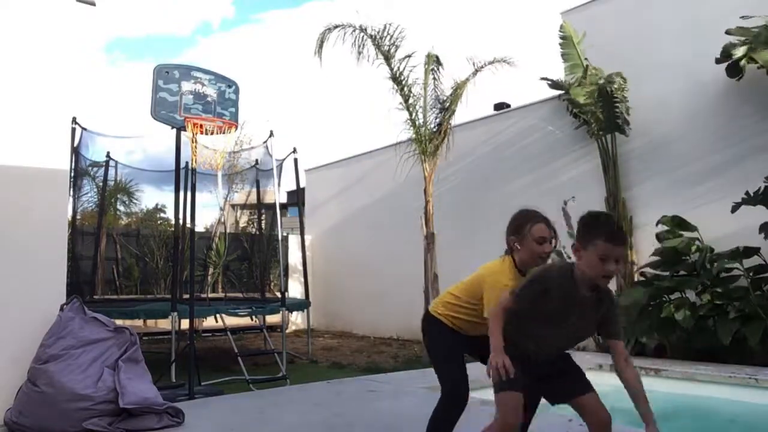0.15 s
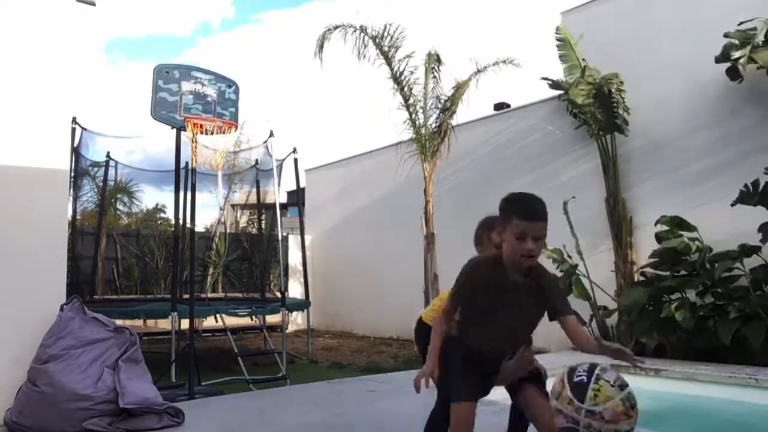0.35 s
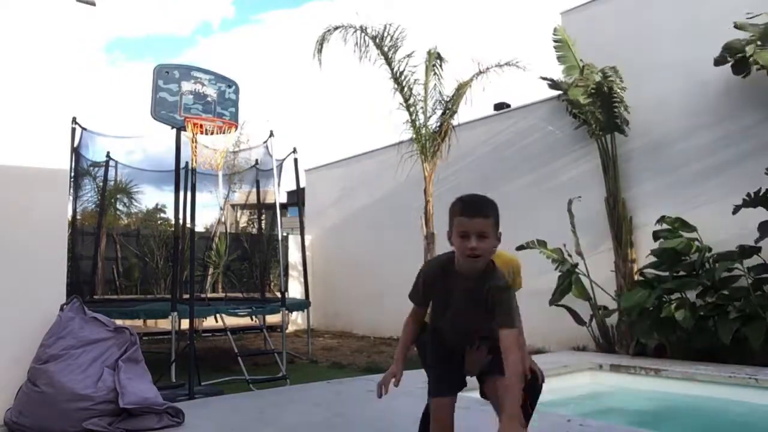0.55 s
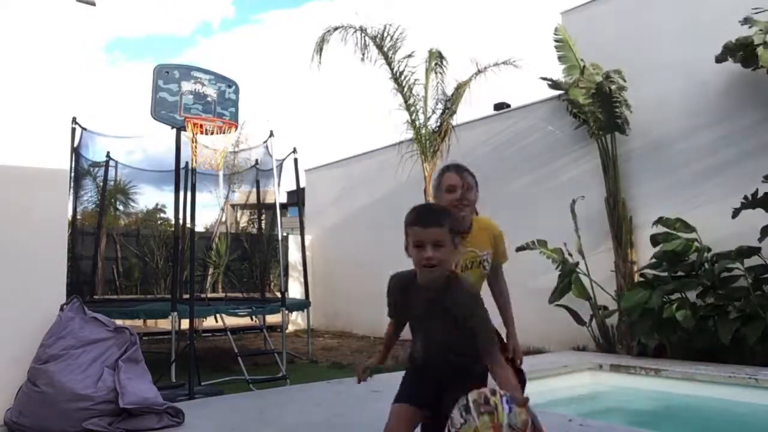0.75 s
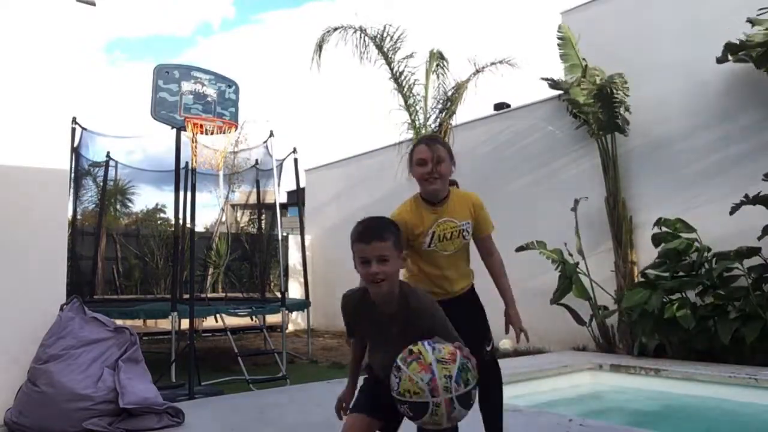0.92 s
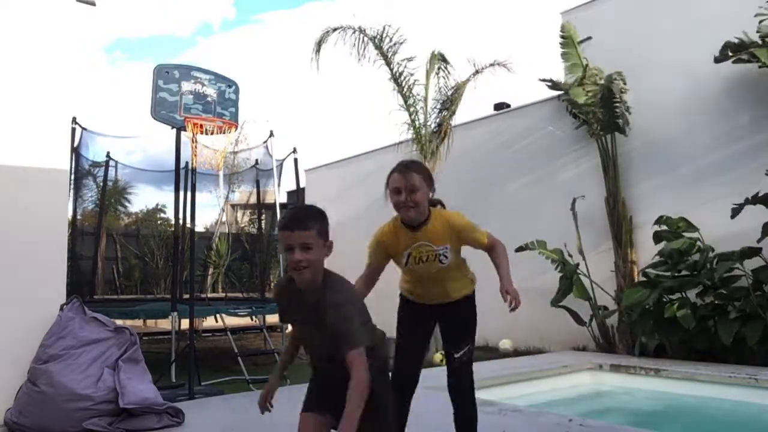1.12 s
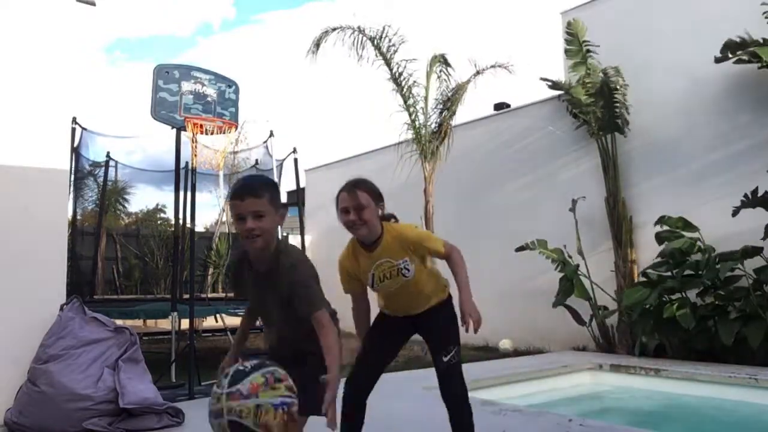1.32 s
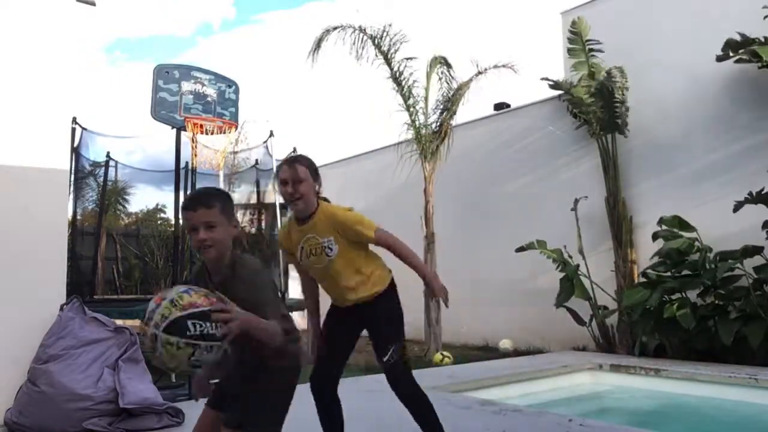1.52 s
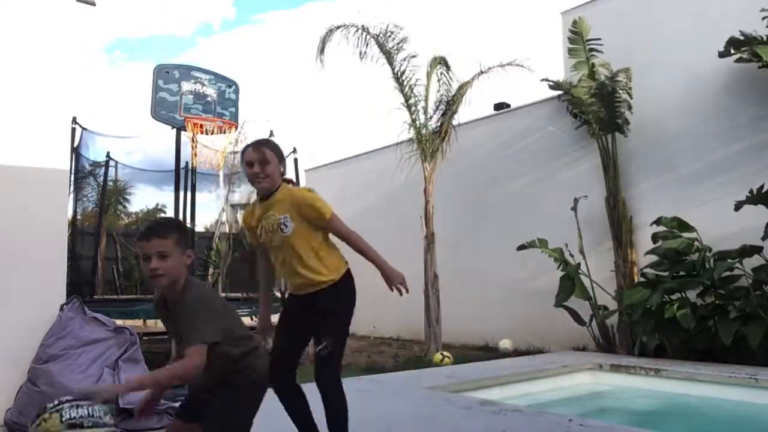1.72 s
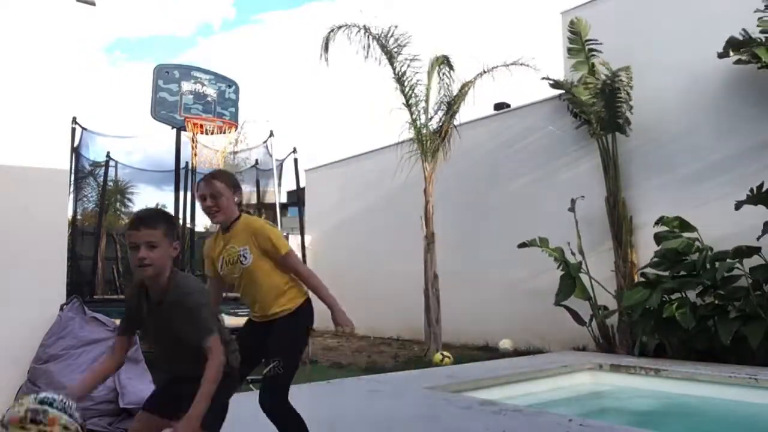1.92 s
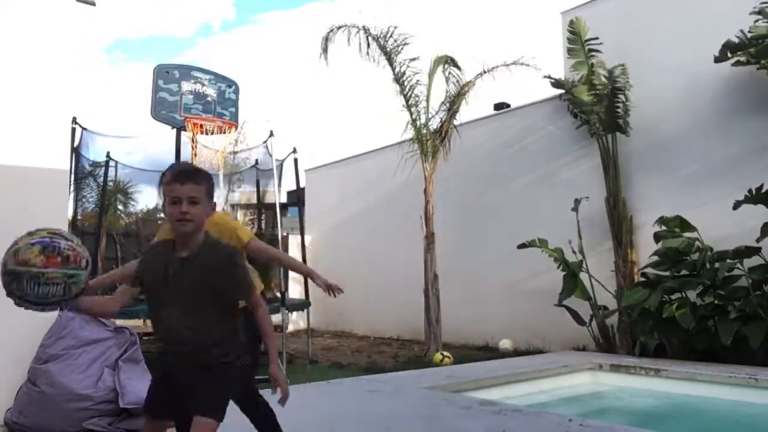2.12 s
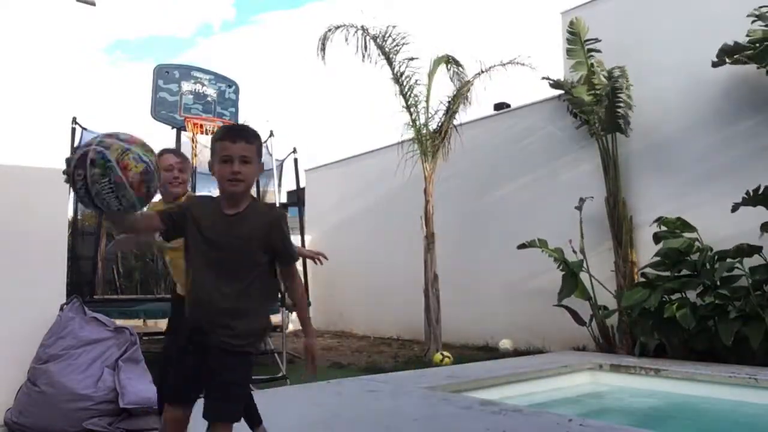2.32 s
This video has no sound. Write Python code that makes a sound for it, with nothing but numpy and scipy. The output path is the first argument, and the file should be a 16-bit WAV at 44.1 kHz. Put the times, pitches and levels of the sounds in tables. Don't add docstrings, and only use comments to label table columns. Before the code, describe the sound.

A basketball bounces slowly on hard concrete, slapping and thumping with short echoes off backyard walls

```python
import sys
import numpy as np
from scipy import signal
from scipy.io import wavfile
from scipy.ndimage import uniform_filter1d

SR = 44100
rng = np.random.default_rng(int(sys.argv[2]) if len(sys.argv) > 2 else 0)


def rack_gain(trim_db):
    fader = np.asarray(trim_db, float)
    return 10 ** (fader / 20)


def to_wav(s):
    ch = np.atleast_2d(s).T
    pcm = np.round(np.clip(ch, -1, 1) * 32767)
    wavfile.write(sys.argv[1], SR, pcm.astype(np.int16))


N = 103635


def at_hz(points, hz):
    table = np.array(points)
    return np.interp(np.log(hz), np.log(table[:, 0]), table[:, 1])


def band_filter(x, low_hz, high_hz, order=2):
    return signal.sosfilt(signal.butter(order, [low_hz, high_hz], "band", fs=SR, output="sos"), x)


def bands(size):
    edges = 30 * 2 ** np.arange(0, 9.6, .5)
    lead_in = 4000
    white = rng.standard_normal((2, size + lead_in))
    out = []
    for k, (low, high) in enumerate(zip(edges, edges[1:])):
        out.append((np.sqrt(low * high), band_filter(white[k % 2], low, high)[-size:]))
    return out


def slow_noise(size, span):
    return uniform_filter1d(rng.standard_normal(size), size=span) * np.sqrt(span)


def decay(t, t60):
    return rack_gain(-60 * t / t60)


def hum():
    # frequency in Hz, level in dB.
    hum_colour = [(18, -31), (30, 1), (134, -3.5), (328, -15.5), (499, -20.5), (740, -24), (1160, -25.5),
                  (5450, -37.5), (16000, -50.5)]
    level_db, patchy_db = -54.5, 1.8
    out = 0
    for hz, band in bands(N):
        drift = slow_noise(N, 4000)
        out = out + rack_gain(at_hz(hum_colour, hz) + patchy_db * drift) * band
    return rack_gain(level_db) * out / np.std(out)


def blow(t, thump_db, thump_hz, slap_db, slap_hz, snap_db):
    thump_cycles, rise_s = 2.8, .002
    slab_db, slab_hz, slab_t60_s = -6, 104.2, 0.033
    rise = 1 - np.exp(-t / rise_s)
    air = decay(t, thump_cycles / thump_hz * 2) * np.sin(2 * np.pi * thump_hz * t)
    slab = decay(t, slab_t60_s) * np.sin(2 * np.pi * slab_hz * t)
    thump = rise * (rack_gain(thump_db) * air + rack_gain(thump_db + slab_db) * slab)

    snap_hz, peak_db, skin_db, skin_hz = 4000, 9, 9, 648
    click = 1.0 * (t == 0)
    band = band_filter(click, 370, 8800)
    bright = signal.lfilter(*signal.butter(1, snap_hz, "high", fs=SR), band)
    shelved = band + (rack_gain(snap_db) - 1) * bright
    slap = shelved + rack_gain(peak_db) * signal.lfilter(*signal.iirpeak(slap_hz, 3.0, fs=SR), shelved)
    slap = slap + rack_gain(skin_db) * signal.lfilter(*signal.iirpeak(skin_hz, 1.5, fs=SR), slap)
    return thump, rack_gain(slap_db) * slap


def yard(t):
    # frequency in Hz, level in dB.
    yard_colour = [(50, -32.5), (110, -37.5), (250, -17), (500, -14), (1200, -18.5), (2500, -23),
                   (6000, -15.5), (14000, -29)]
    # frequency in Hz, t60 in seconds.
    yard_t60 = [(60, 1), (160, 0.31), (420, 0.34), (1100, 0.34), (2910, 0.27), (7680, 0.17)]
    # frequency in Hz, level in dB, t60 in seconds.
    standing = [(73.56, -55, 0.68), (103.03, -52.5, 0.65), (113.86, -51.5, 0.64), (156.1, -57, 0.44),
                (256, -37.5, 0.36), (321.9, -30, 0.17), (1003, -32, 0.15), (1446, -31, .2),
                (2190, -35, 0.19), (2554, -41, 0.15), (3890, -27, 0.078), (5110, -25.5, 0.09)]
    late_db, late_stretch = -24.5, 6.7
    out = 0
    for hz, band in bands(len(t)):
        t60 = at_hz(yard_t60, hz)
        fall = decay(t, t60) + rack_gain(late_db) * decay(t, late_stretch * t60)
        out = out + rack_gain(at_hz(yard_colour, hz)) * band * fall
    for hz, db, t60 in standing:
        out = out + rack_gain(db) * decay(t, t60) * np.sin(2 * np.pi * (hz * t + rng.random()))
    return out


def yard_answer(part, tail, build_s, t):
    build = 1 - np.exp(-(t / build_s) ** 2)
    return signal.fftconvolve(part, tail * build)[:SR]


def wall_smear(slap):
    smear_s = .006
    rough = rng.standard_normal(len(slap)) * decay(np.arange(len(slap)) / SR, smear_s)
    return signal.fftconvolve(slap, rough / np.linalg.norm(rough))[:len(slap)]


def heard(rows, echoes, losses, facings):
    near_thump_db, near_slap_db = 5, -1
    wall_thump_db, wall_cut_hz = -14, 6000
    grit_db, grain_db, grain_s = -3, 4, .05
    t = np.arange(SR) / SR
    out = np.zeros(N + 3 * SR)
    for (start_s, *voice), lags, loss, facing in zip(rows, echoes, losses, facings):
        near_s, side_s, far_s = lags
        side_db, far_db = loss
        snap_db, low_db, high_db = facing
        thump, slap = blow(t[:SR // 10], *voice, snap_db)
        grain = slow_noise(SR, 40)
        tail = yard(t)
        grainy_tail = tail * rack_gain(grain_db * grain * np.exp(-t / grain_s))
        smeared = wall_smear(slap)

        sound = rack_gain(low_db) * yard_answer(thump, tail, .017, t)
        sound = sound + rack_gain(high_db) * yard_answer(slap, grainy_tail, .009, t)
        gritty = slap + rack_gain(grit_db) * smeared
        near = rack_gain(near_thump_db) * thump + rack_gain(near_slap_db) * gritty
        dull = band_filter(smeared, wall_cut_hz / 4, wall_cut_hz, order=1) + rack_gain(wall_thump_db) * thump
        arrivals = [(0, thump + gritty), (near_s, near),
                    (side_s, rack_gain(side_db) * dull), (far_s, rack_gain(far_db) * dull)]
        for lag_s, part in arrivals:
            i = int(lag_s * SR)
            sound[i:i + len(part)] += part
        i = int((start_s + 1) * SR)
        out[i:i + SR] += sound
    return out[SR:SR + N]


def dribble():
    # start in seconds, thump level in dB, thump pitch in Hz, slap level in dB, slap peak in Hz.
    bounces = [
        (-.22, -18.5, 140, -34.5, 2500),
        (.2047, -8.5, 185.3, -8, 2650),
        (.6547, -14.5, 147.7, -17.5, 2530),
        (1.2, -12, 142.7, -21.5, 1790),
        (1.861, -11, 143, -19, 2590),
    ]
    # near wall, side wall, far wall, all in seconds.
    wall_lags = [(.005, .017, .032), (.005, .0168, .031), (.0057, .023, .031), (.0063, .018, .04),
                 (.0066, .016, .023)]
    # side wall in dB, far wall in dB.
    wall_levels = [(-6, -6), (-5, -3), (-6, 0), (-4, -4), (3, 0)]
    # snap in dB, yard answer to the thump in dB, to the slap in dB.
    facings = [(1.5, 8.5, 14.5), (-15.5, -2.5, -7.5), (4.5, 0, -3.5), (5.5, 0.5, -2), (1.5, 0.5, 1)]
    return heard(bounces, wall_lags, wall_levels, facings)


def palm_touches():
    # start in seconds, thump level in dB, thump pitch in Hz, slap level in dB, slap peak in Hz.
    palms = [
        (.47, -47.5, 300, -42, 2930),
        (.925, -58, 250, -49.5, 3100),
        (1.33, -53, 108, -66, 3000),
        (1.465, -27, 300, -77.5, 2970),
        (1.61, -94, 250, -98, 3000),
        (1.697, -83, 300, -41, 2500),
        (2.085, -45, 110, -71, 4000),
        (2.21, -25.5, 320, -46, 3200),
    ]
    count = len(palms)
    lags_s, levels_db, facing_db = (.006, .021, .03), (-2, -2), (-4, -6, -3)
    return heard(palms, [lags_s] * count, [levels_db] * count, [facing_db] * count)


def soles():
    # start in seconds, length in seconds, squeak level in dB, hiss level in dB, start pitch in Hz.
    drags = [
        (1.03, .19, -62, -69, 1950),
        (1.706, .04, -68, -64, 2300),
        (1.42, .05, -85, -66, 3000),
        (2.13, .03, -85, -67, 3000),
    ]
    width_hz, octave_db, rise_hz_per_s = 450, -12, 2200
    out = np.zeros(N + SR)
    for start_s, length_s, squeak_db, hiss_db, start_hz in drags:
        noise = rng.standard_normal((3, SR // 4))
        t = np.arange(SR // 4) / SR
        phase = 2 * np.pi * np.cumsum(start_hz + rise_hz_per_s * t) / SR
        rough = signal.sosfilt(signal.butter(2, width_hz / 2, fs=SR, output="sos"), noise[:2])
        rough = rough / np.std(rough)
        squeak = rough[0] * np.sin(phase) + rack_gain(octave_db) * rough[1] * np.sin(2 * phase)
        hiss = 2 * band_filter(noise[2], 1500, 5000)
        swell = np.sqrt(np.sin(np.pi * np.clip(t / length_s, 0, 1)).clip(0))
        i = int(start_s * SR)
        out[i:i + len(t)] += swell * (rack_gain(squeak_db) * squeak + rack_gain(hiss_db) * hiss)
    return out[:N]


def scene():
    return (hum() + dribble() + palm_touches() + soles())[None]


def low_pass(x):
    return signal.sosfilt(signal.butter(12, 16520, fs=SR, output="sos"), x)


def record(dry):
    low_hz, top_hz = 59.4, 16600
    low_cut = signal.sosfilt(signal.butter(4, low_hz, "high", fs=SR, output="sos"), dry)
    finished = signal.sosfilt(signal.cheby2(10, 50, top_hz, fs=SR, output="sos"), low_cut)
    return low_pass(finished)


dry = scene()
out = record(dry)
to_wav(out)
```